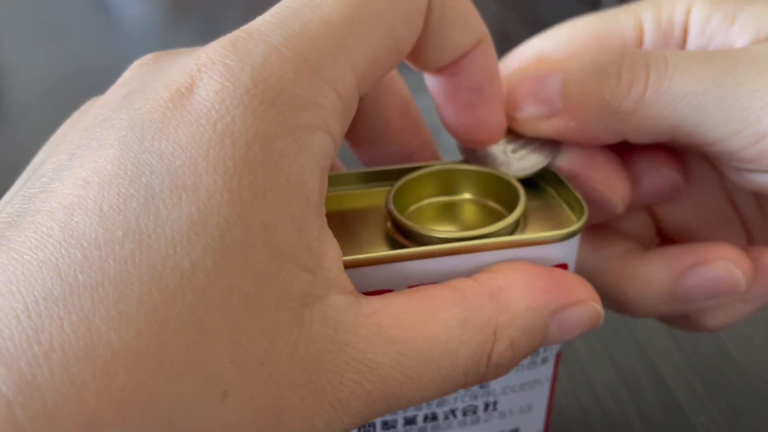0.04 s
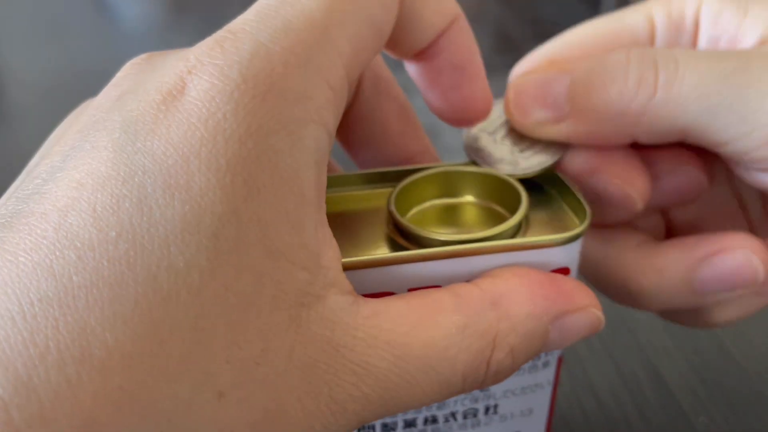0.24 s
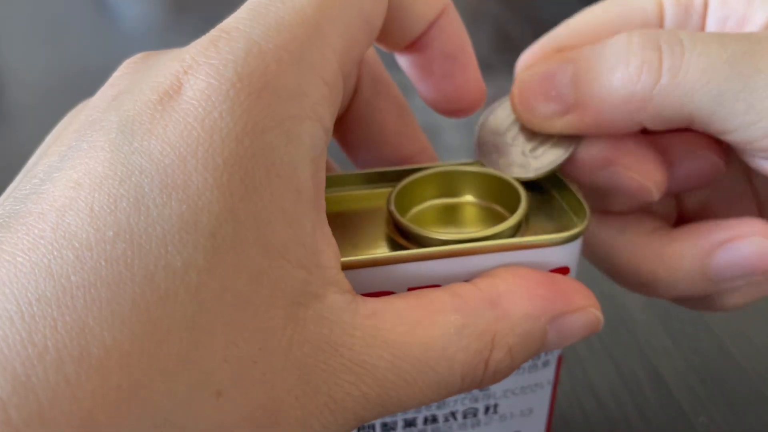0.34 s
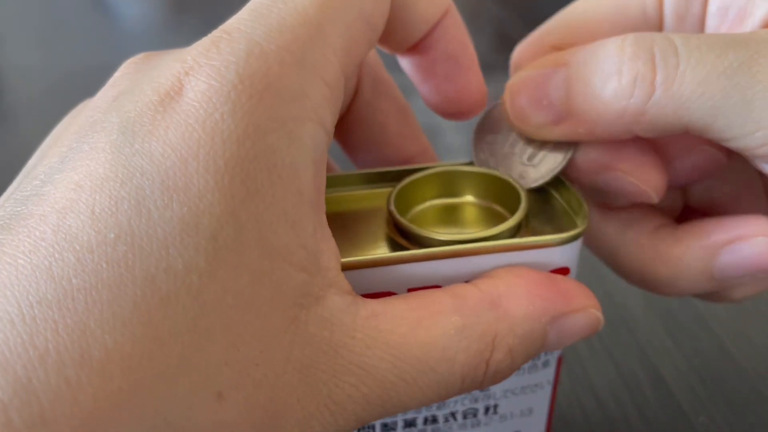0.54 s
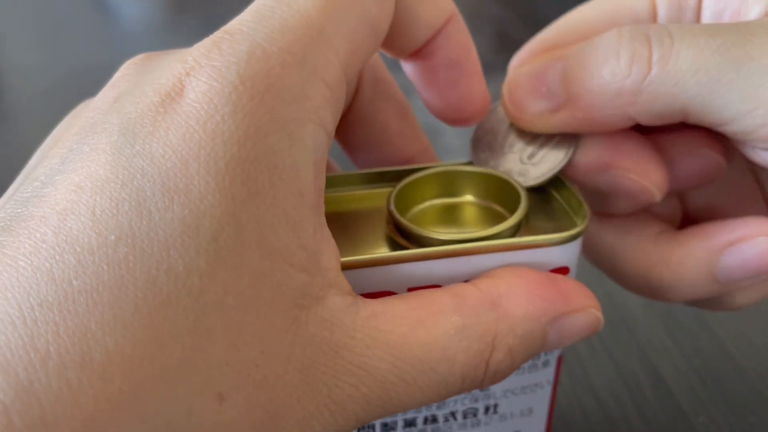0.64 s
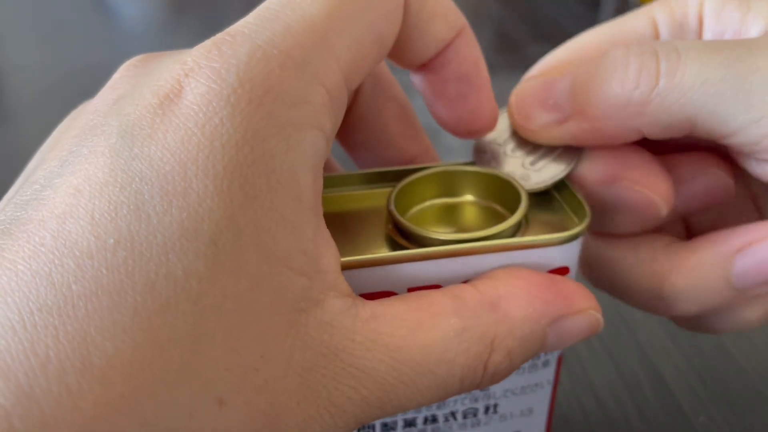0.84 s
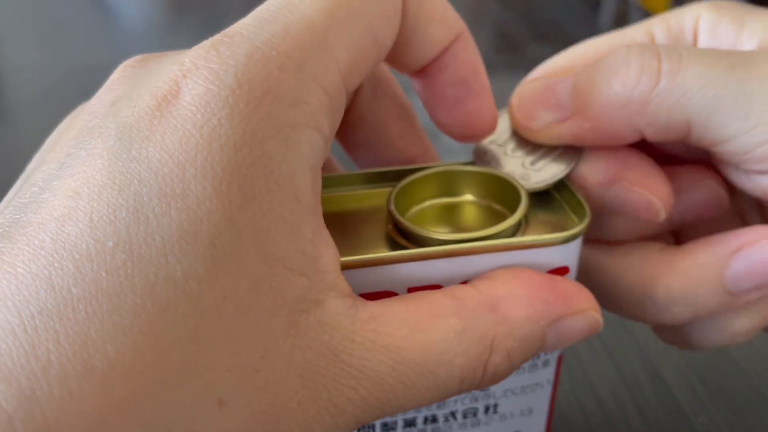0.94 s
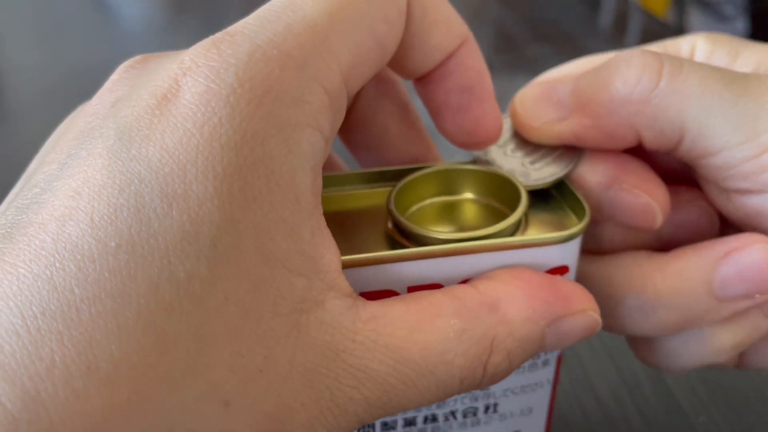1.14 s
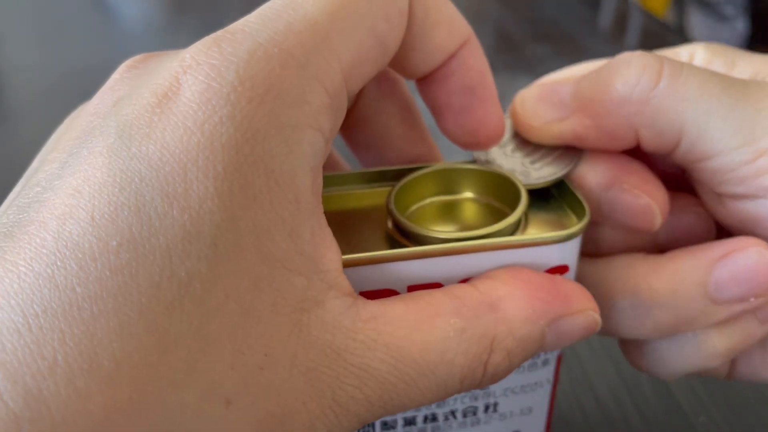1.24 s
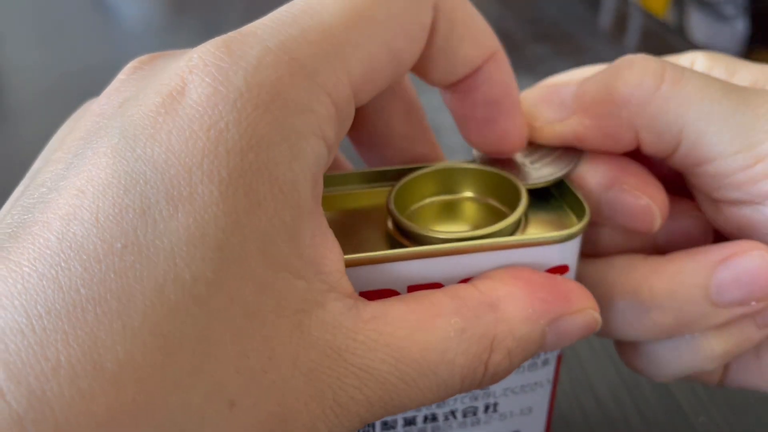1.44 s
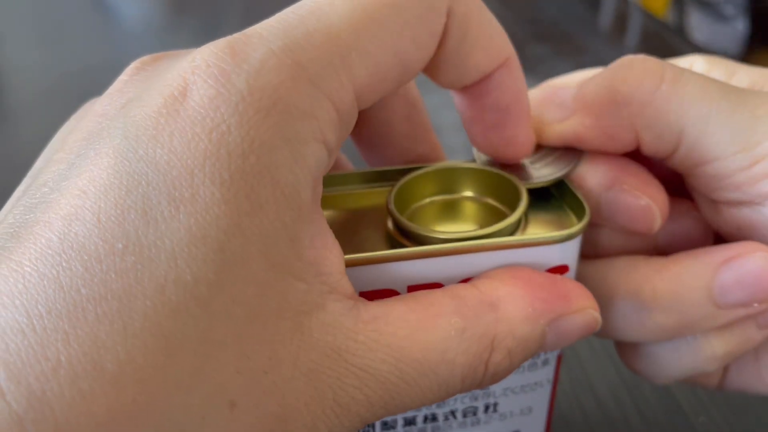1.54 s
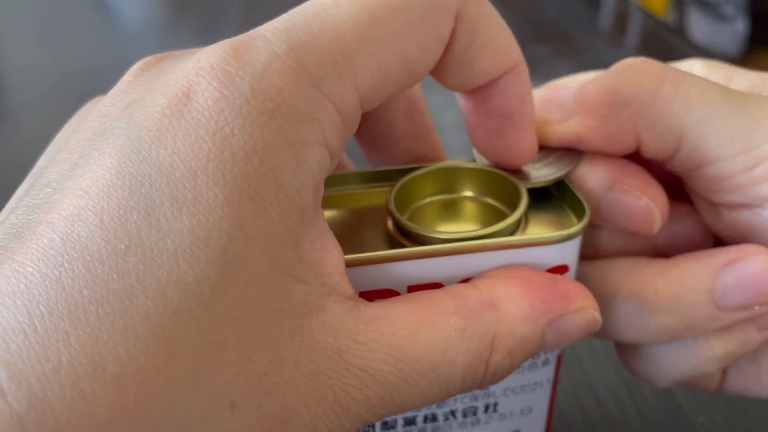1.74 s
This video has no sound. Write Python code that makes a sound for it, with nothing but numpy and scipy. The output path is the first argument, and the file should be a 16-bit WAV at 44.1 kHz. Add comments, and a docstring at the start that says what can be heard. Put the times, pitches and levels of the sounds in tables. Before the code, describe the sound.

A coin pries at a small metal tin lid, heard close in a quiet room. Soft finger rubbing and faint scraping start at once, with a light tap near 0.15 seconds. A loud, sharp, hollow snap comes at 0.22, then gritty scraping from 0.3 to 0.4 and a small tick. A bright, thin click follows at 0.7. Quiet air remains, with very faint touches near 1.37 and 1.54.

```python
"""Coin levering at a tin lid

A coin levers at the small round lid of a candy tin held in the hand, close by in a quiet room.
It grinds along the rim, slips off with one sharp snap, clicks on the lid and touches faintly later.
Contacts ring damped modes and noise cracks; scrapes are random slips through resonances, with rubbing.
The hand damps the metal quickly; an echo and a diffuse tail form the room, over steady air noise."""
import sys
import numpy as np
from scipy import signal
from scipy.fft import rfft, irfft
from scipy.io import wavfile

SR = 44100
rng = np.random.default_rng(int(sys.argv[2]) if len(sys.argv) > 2 else 0)


def dump_mix(stems):
    """Bounce the given channels to the path in sys.argv[1] as a 16-bit WAV at rate SR."""
    frames = np.atleast_2d(stems).T  # one column per channel
    limited = np.clip(frames, -1, 1)  # hard clip at full scale
    pcm = np.round(limited * 32767).astype(np.int16)
    wavfile.write(sys.argv[1], SR, pcm)


N = 79380  # samples, 1.8 s


def amp(db):
    """Level: every 20 dB is a factor of ten in amplitude."""
    return 10 ** (np.asarray(db) / 20)


def evened(x):
    """Normalization: scales to an rms of 1."""
    return x / np.sqrt(np.mean(x ** 2) + 1e-20)


def read(points, hz):
    """Interpolation: reads a table of (Hz, value) linearly along a log-frequency axis."""
    table_hz, value = np.transpose(points)
    return np.interp(np.log(hz + 1), np.log(table_hz + 1), value)


def add(mix, start_s, sound):
    """Superposition: adds a sound into the mix, in place, from start_s on."""
    part = mix[max(round(start_s * SR), 0):][:len(sound)]
    part += sound[:len(part)]


def colour(x, spectrum):
    """Linear filtering: multiplies the Fourier spectrum by gains in dB."""
    hz = np.fft.rfftfreq(len(x), 1 / SR)
    return irfft(rfft(x) * amp(read(spectrum, hz)), len(x))


def noise(spectrum, size):
    """Coloured noise: white noise through a spectrum, at rms 1."""
    return evened(colour(rng.standard_normal(size), spectrum))


def decay(t, t60):
    """Exponential damping: the amplitude falls 60 dB in t60 seconds."""
    return np.exp(-np.log(1000) * t / t60)


def ring(modes, t):
    """Modal superposition: damped sines, neighbouring modes starting in opposite directions."""
    total = np.zeros(len(t))
    for k, (hz, db, t60) in enumerate(modes):
        total += (-1) ** k * amp(db) * decay(t, t60) * np.sin(2 * np.pi * hz * t)
    return total


def tilted(rows, tilt_db):
    """Spectral tilt: adds tilt_db per octave above the pivot to modes or a spectrum."""
    pivot_hz = 2070
    return [(hz, db + tilt_db * np.log2(hz / pivot_hz), *rest) for hz, db, *rest in rows]


def room_air():
    """Stationary noise: the quiet room's steady background."""
    # Spectrum of the air. Each row: frequency in Hz, relative density in dB per Hz.
    air_spectrum = [(12, -13), (20, 7), (27, -12), (60, -5), (81, -11), (187, -15.5), (301, -17.5),
                    (513, -21.5), (607, -20.5), (660, -21.5), (1810, -27), (13200, -32.5), (16000, -34.5)]
    level_db = -64.5
    return amp(level_db) * noise(air_spectrum, size=N)


def scrapes():
    """Stick-slip friction: random slips of the coin's edge drive resonances and hiss; fingers rub the wall."""
    # Strokes of the coin's edge along the rim. Each row: start in seconds, length in seconds,
    # grind level in dB, grind tilt in dB per octave, hiss level in dB, finger rubbing level in dB.
    strokes = [(.045, 0.055, -70.5, -18, -66.5, -58), (0.101, .085, -70, 8, -75, -71),
               (0.202, 0.031, -76, -7, -81, -61.5), (0.307, 0.046, -57, -10.5, -67, -77),
               (0.336, 0.029, -55, 0.5, -68, -72), (0.369, .05, -58, -3, -74, -72),
               (0.735, 0.026, -78.5, -1, -83, -62)]
    # Resonances under the sliding edge. Each row: frequency in Hz, level in dB, t60 in seconds.
    grind_modes = [(747, -25, 0.046), (1450, -8, 0.022), (1816, -3, 0.022), (1993, 2, .016),
                   (2250, -1, 0.014)]
    # Spectrum of the hiss. Each row: frequency in Hz, relative density in dB per Hz.
    hiss_spectrum = [(200, 19), (1200, 6), (3000, -13.5), (4200, 9.5), (7000, -8.5), (10000, 6),
                     (16000, -36)]
    # Spectrum of the rubbing fingers. Each row: frequency in Hz, relative density in dB per Hz.
    rub_spectrum = [(40, 2.5), (140, -1.5), (300, -1), (600, -13.5), (1500, -10), (5000, -29)]
    slips_per_s, slip_spread_db = 1400, 2
    attack_s, release_s = 0.008, 0.026

    out, t = np.zeros(N), np.arange(SR // 4) / SR
    for start_s, length_s, grind_db, tilt_db, hiss_db, rub_db in strokes:
        happens = rng.random(len(t)) < slips_per_s / SR
        slips = happens * rng.standard_normal(len(t))
        slips *= amp(slip_spread_db * np.minimum(rng.exponential(1, len(t)), 2))
        resonance = ring(tilted(grind_modes, tilt_db), t)
        grind = amp(grind_db) * evened(signal.fftconvolve(slips, resonance)[:len(t)])
        hiss = amp(hiss_db) * evened(colour(slips, hiss_spectrum))
        rub = amp(rub_db) * noise(rub_spectrum, size=len(t))
        rise = np.clip(t / attack_s, 0, 1)
        fall = np.clip((length_s - t) / release_s + 0.5, 0, 1)  # half-way down at length_s
        add(out, start_s, rise * fall * (grind + hiss + rub))
    return out


def contacts():
    """Impact excitation: each contact rings the parts by its own amounts, with a crack and a soft thud.

    Returns the ringing with thuds and, apart, the cracks, which stand for dense modes."""
    # Contacts of the coin. Each row: start in seconds; levels in dB of hollow body, air cavity, side wall, rim,
    # lid, coin ring and crack; hardness in dB per octave; thud level in dB.
    contact_rows = [(0.0498, -63, -77, -68, -82, -71, -90, -60.5, 0.5, -58.5),
                    (0.1525, -37, -29, -59, -74, -50.5, -87, -45, -3, -76),
                    (0.2163, -36, -44, -60, -66, -67, -75, -34.5, -1.5, -69),
                    (0.2195, -19, -30, -35, -20.5, -52, -62, -24.5, 0.5, -44.5),
                    (0.4078, -48.5, -71, -67.5, -82, -67, -85, -62, -4, -72),
                    (0.4217, -37, -42.5, -59, -65, -70, -44, -43, -1.5, -67),
                    (0.4915, -61.5, -58.5, -87.5, -90.5, -87.5, -91.5, -78.5, 0.5, -79.5),
                    (0.7072, -51, -54, -84.5, -67, -29.5, -61.5, -34.5, -0.5, -48.5),
                    (1.3641, -62.5, -55, -54, -88, -66, -87.5, -71, 6, -73),
                    (1.3717, -72.5, -76, -74, -89, -87.5, -89.5, -74.5, 2.5, -54.5),
                    (1.5428, -65, -81, -75.5, -89.5, -59, -89.5, -69, -5.5, -52)]
    # Hollow body of the tin. Each row: frequency in Hz, level in dB, t60 in seconds.
    body_modes = [(1327, -3.5, 0.021), (1547, -2.5, 0.011), (2042, -0.5, 0.014), (2229, -5.5, 0.022)]
    # Air cavity of the tin. Each row: frequency in Hz, level in dB, t60 in seconds.
    cavity_modes = [(1888, 0, 0.021), (1690, 1.5, 0.0027)]
    # Broad side walls. Each row: frequency in Hz, level in dB, t60 in seconds.
    wall_modes = [(484, -1, .045), (610, -4.5, .03), (703, -3.5, 0.098), (868.6, -2.5, 0.024),
                  (1065, -5.5, 0.015)]
    # Rolled rim. Each row: frequency in Hz, level in dB, t60 in seconds.
    rim_modes = [(3860, -4, .008), (4820, -11, .017), (5730, -5, .017), (7080, 3, .008), (7650, 0, .013),
                 (8320, -11, .016), (8940, -1, .022), (9230, 5, .007), (9860, 13, .005), (10530, 1, .012),
                 (11360, 1, .011), (12710, -7, .018), (13880, -1, .014), (14980, -10, .009)]
    # Round lid. Each row: frequency in Hz, level in dB, t60 in seconds.
    lid_modes = [(1450, -1, .012), (1920, -3, .006), (2660, -8, .01), (3970, -4, .014), (4760, -9, .014),
                 (5710, -5, .015), (6690, -13, .022), (8000, -3, .021), (8840, 2, .009), (9480, 4, .012),
                 (11640, -3, .005), (12750, 0, .006), (13650, -8, .013), (13330, -22, .055)]
    # Coin, pinched between fingers. Each row: frequency in Hz, level in dB, t60 in seconds.
    coin_modes = [(5800, 1, .022), (8150, -14.5, .17), (10300, -6, .014)]
    # Spectrum of the crack. Each row: frequency in Hz, relative density in dB per Hz.
    crack_spectrum = [(100, -12.5), (500, -5.5), (1000, -5.5), (1600, -1.5), (2300, 1.5), (3000, -7),
                      (6000, -2.5), (7500, -5), (10000, -4.5), (14000, -8.5), (15300, -8), (16300, -16)]
    contact_s, crack_t60_s = 0.00043, 0.016
    thud_hz, thud_t60_s = 222, 0.025

    parts = (body_modes, cavity_modes, wall_modes, rim_modes, lid_modes, coin_modes)
    rung, cracks, t = np.zeros(N), np.zeros(N), np.arange(SR // 4) / SR
    onset = np.minimum(t / contact_s, 1)
    thud = decay(t, thud_t60_s) * np.sin(2 * np.pi * thud_hz * t)
    for start_s, *parts_db, crack_db, hardness_db, thud_db in contact_rows:
        metal = np.zeros(len(t))
        for db, modes in zip(parts_db, parts):
            metal += amp(db) * ring(tilted(modes, hardness_db), t)
        crack = noise(tilted(crack_spectrum, hardness_db), size=len(t)) * decay(t, crack_t60_s)
        add(rung, start_s, onset * (metal + amp(thud_db) * thud))
        add(cracks, start_s, onset * amp(crack_db) * crack)
    return rung, cracks


def room(x):
    """Reverberation: one early reflection and a diffuse tail whose low end lasts longest."""
    # Reverberation time. Each row: frequency in Hz, t60 in seconds.
    tail_t60 = [(300, .3), (800, 0.24), (2000, 0.23), (5500, 0.13), (10000, .17), (15000, .13)]
    # Level of the tail. Each row: frequency in Hz, level in dB against the sound sent in.
    tail_db = [(200, -8.5), (700, -12.5), (1600, -16.5), (2200, -20), (3000, -15.5), (5000, -17),
               (7500, -16), (10000, -19), (13500, -17.5), (15000, -26)]
    onset_s, echo_s, echo_db = 0.0042, 0.0162, -28.5

    hz, t, bands = signal.stft(rng.standard_normal(SR // 2), SR, nperseg=256)
    t60 = read(tail_t60, hz)[:, None]
    unit_energy = np.sqrt(2 * np.log(1000) / (t60 * SR))  # offsets the energy a longer decay adds
    bands = bands * decay(t, t60) * unit_energy * amp(read(tail_db, hz))[:, None]
    tail = signal.istft(bands, SR, nperseg=256)[1]
    out = np.zeros(N)
    add(out, onset_s, signal.fftconvolve(x, tail))
    add(out, echo_s, amp(echo_db) * x)
    return out


def scene():
    """Superposition of direct sound, room response and air noise."""
    crack_send_db = 8  # the dense modes radiate all round, so the room gets more of them
    rung, cracks = contacts()
    tin = scrapes() + rung
    reverberant = room(tin + amp(crack_send_db) * cracks)
    return (tin + cracks + reverberant + room_air())[None]


def record(dry):
    """Band limitation: a linear-phase low-pass stands for the recorder's upper edge."""
    edge_hz = 16300
    low_pass = signal.firwin(255, edge_hz, window=("kaiser", 9), fs=SR)
    return signal.oaconvolve(dry, low_pass[None], "same")


dry = scene()
out = record(dry)
dump_mix(out)
```